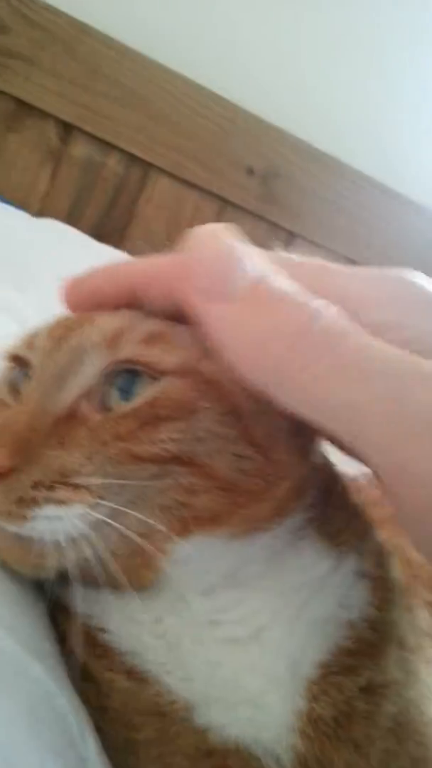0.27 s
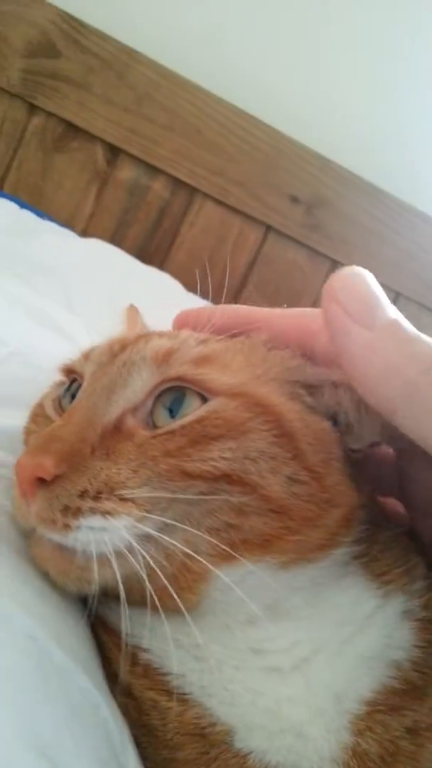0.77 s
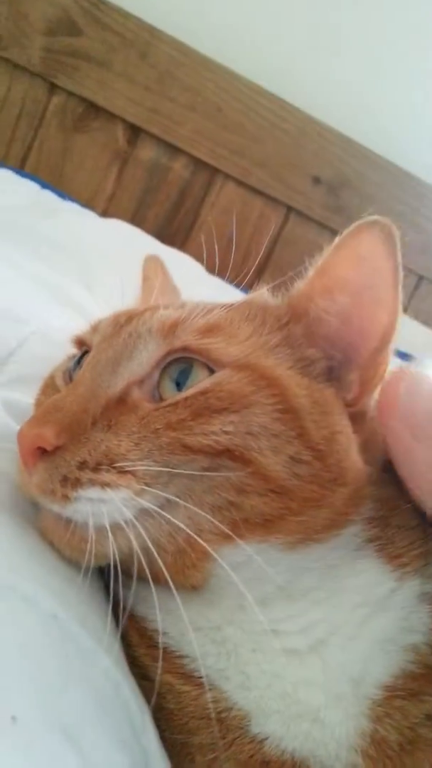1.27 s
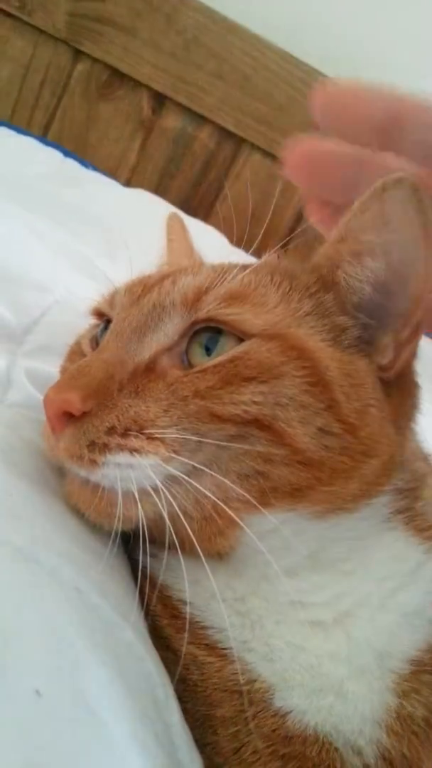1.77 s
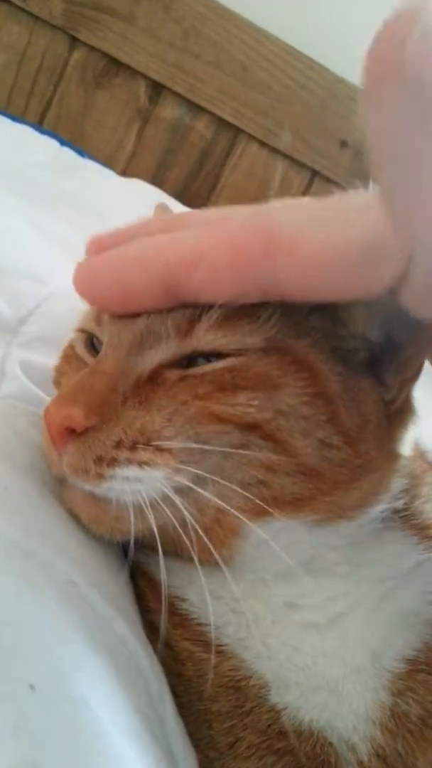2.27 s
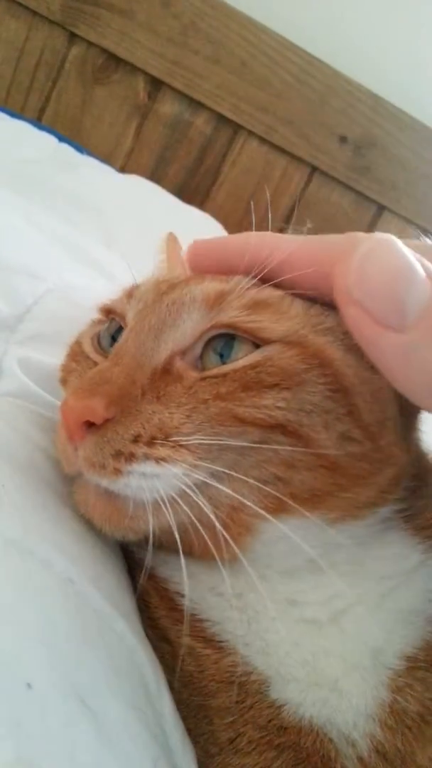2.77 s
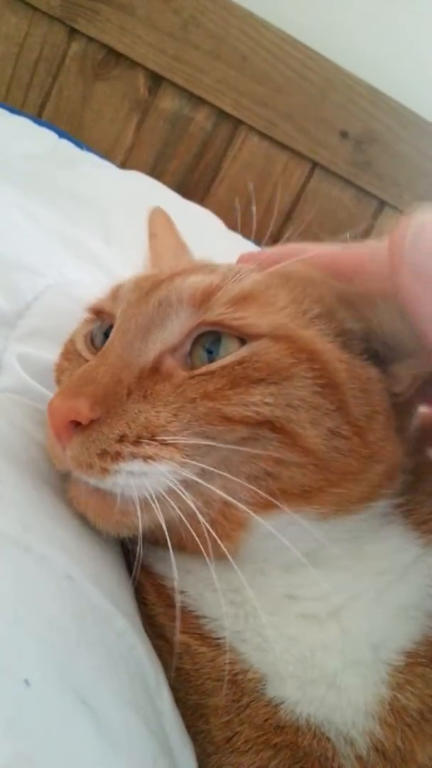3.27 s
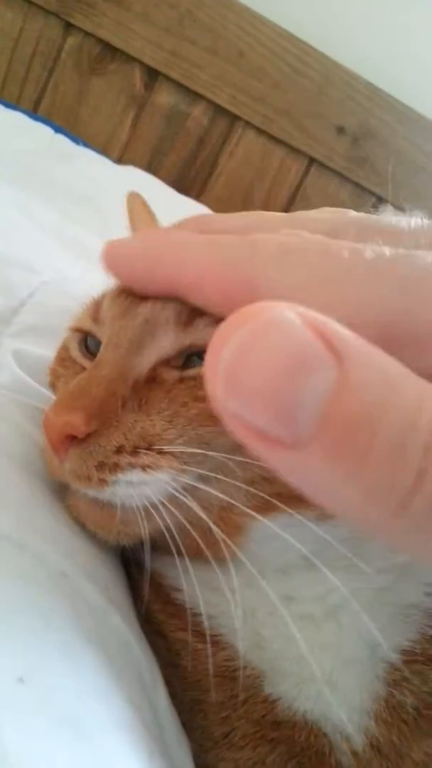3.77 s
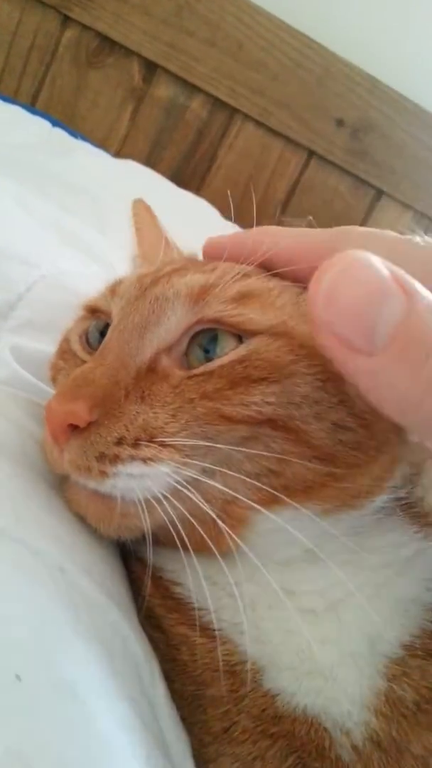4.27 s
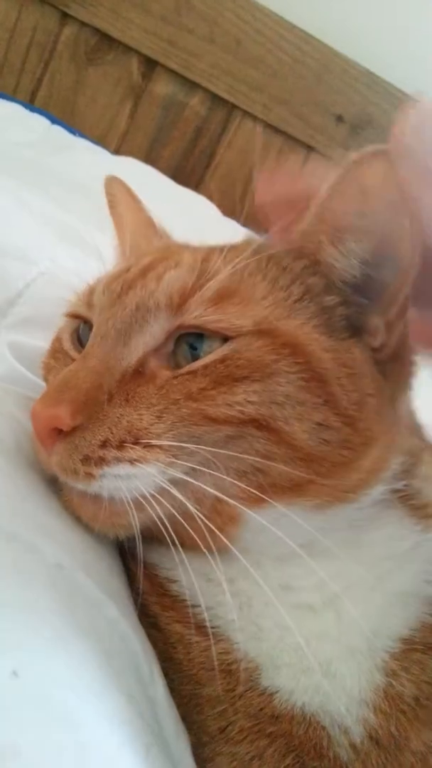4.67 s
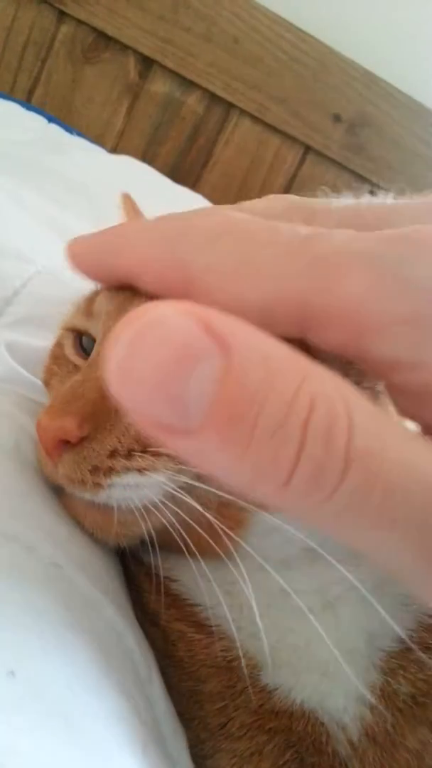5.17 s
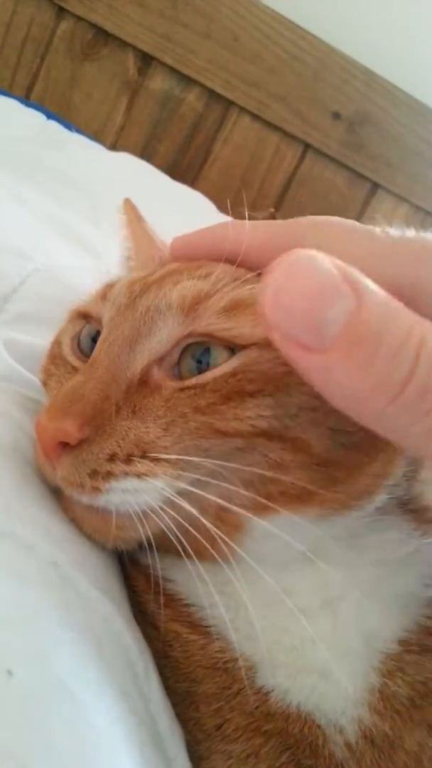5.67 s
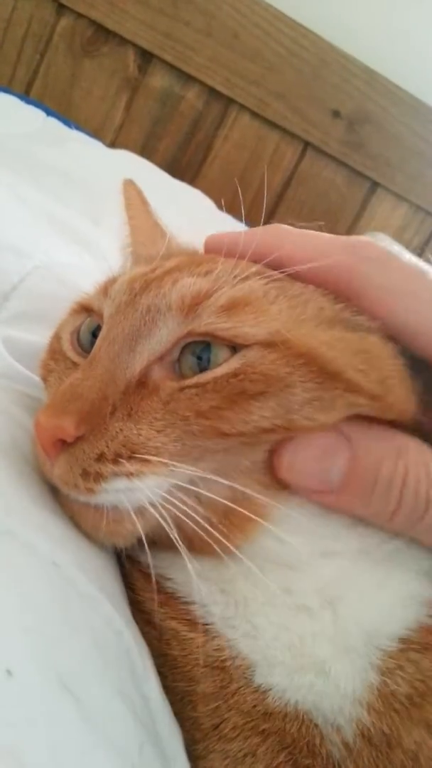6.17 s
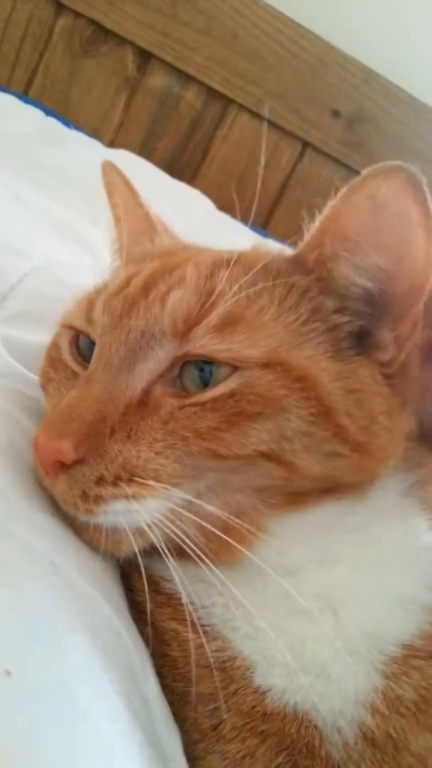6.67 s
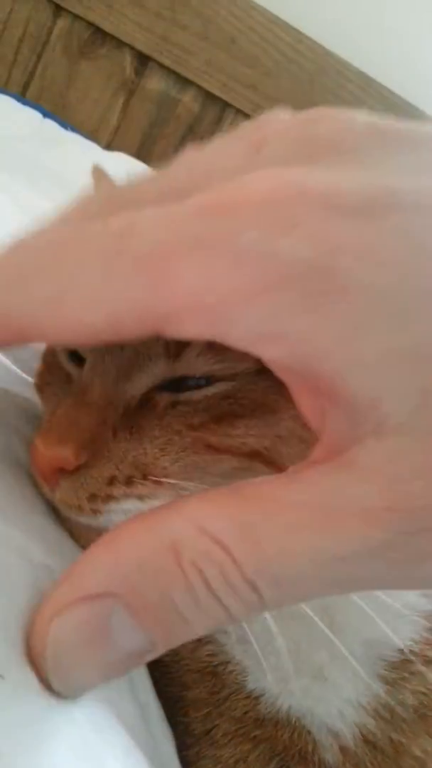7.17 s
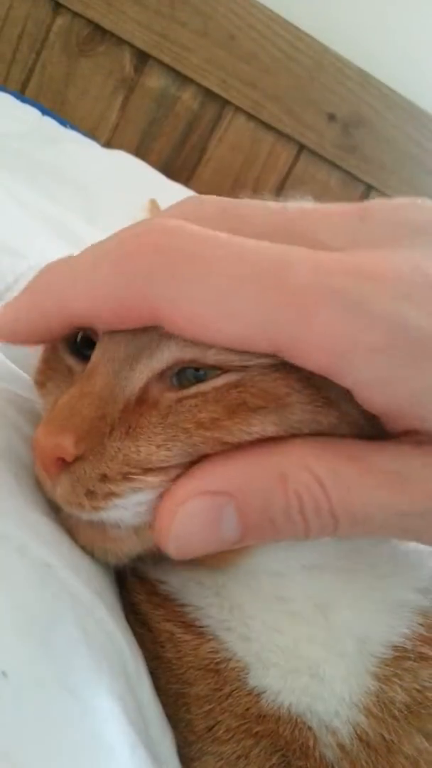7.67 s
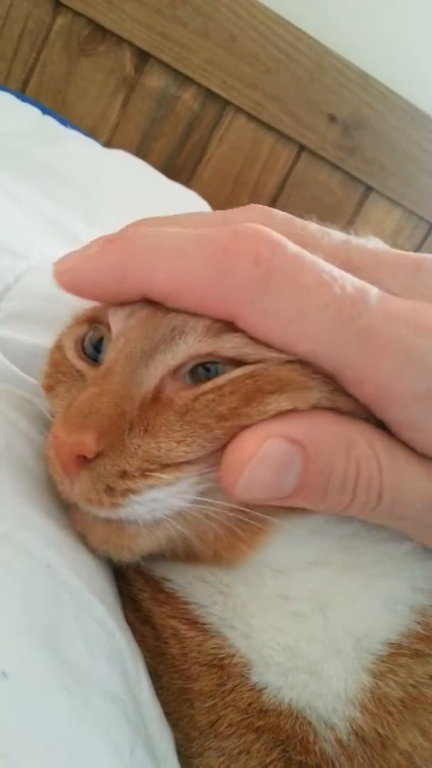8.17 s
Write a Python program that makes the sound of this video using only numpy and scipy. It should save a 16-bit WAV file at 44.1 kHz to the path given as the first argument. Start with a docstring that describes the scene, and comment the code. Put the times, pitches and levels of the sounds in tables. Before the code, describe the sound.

Close, dry indoor sound, with rubbing almost entirely on the left. From 0 to 0.45 s a loud, crackly rasp of fur and cloth bursts out, full of sharp snaps over soft padding thumps. It drops to near quiet, then light scratches return at 0.7 s, a small knock at 1.15 s, and a second strong crackling swipe from 1.3 to 1.6 s. Between 1.9 and 4.2 s come uneven, brighter, thinner strokes with brittle clicks, one fuller rub near 3.1 s. It is sparse until 5.2 s; a hard knock lands at 5.36 s, followed by short scratches to 5.95 s. Another knock hits at 6.3 s, then faint, slightly hollow rubbing, a brief sleeve brush on the right at 7.2 s, and a final knock at 8.28 s. Throughout, a very faint fluttering purr alternates with breaths over low hum, rumble and hiss.

```python
"""On a pillow a phone lies half sunk while a hand strokes a purring cat. Cloth and fur rub at the left port by
stick-slip friction: grains ring over a smooth slide, with snaps, padding bumps, knocks and a cupping hand.
The purr, pulses exciting chest resonances, reaches both ports along with a wavering low hum and room rumble.
The right port adds sharp ticks and hiss coloured by its resonance near 7 kHz, and a sleeve brushes past it."""
import sys
import numpy as np
from scipy import signal
from scipy.fft import rfft, irfft
from scipy.io import wavfile
from scipy.ndimage import uniform_filter1d

SR = 44100
rng = np.random.default_rng(int(sys.argv[2]) if len(sys.argv) > 2 else 0)


def generate_wav(sig):
    """Save sig (samples, or channels by samples) to the path in sys.argv[1] as 16-bit PCM at SR."""
    pcm = np.round(np.clip(np.atleast_2d(sig).T, -1, 1) * 32767).astype(np.int16)
    wavfile.write(sys.argv[1], SR, pcm)


N = 370440

# frequency response of the right microphone port: [f/Hz, gain/dB]
PORT_RESPONSE = [(300, 6.5), (900, -0.5), (3000, 0), (5200, -0.5), (6200, 2.5), (7300, 11.5), (8300, 2.5),
                 (10000, -1), (15000, -5)]


def rubbing(per_s=150.0, spread_db=5.0, ring_share=0.31, patchy_db=3.5, hollow_db=-3.0, hollow_octaves=0.19):
    """Stick-slip friction: fibres release in unequal grains, each with its own resonance, over a smooth slide."""
    # resonances of the grains: [f/Hz, width/Hz, gain/dB]
    grain_rings = [(2000, 770, 8.5), (3100, 2200, -8.5), (4300, 3100, -1), (5900, 1370, 9),
                   (7100, 1040, 12.5)]
    # spectral shape of the fabric: [f/Hz, gain/dB]
    fabric = [(35, -11), (60, -11), (178, 3), (251, 0.5), (390, 2.5), (551, -1.5), (679, -0.5), (835, -2.5),
              (3120, 0.5), (6090, -0.5), (9020, -6.5), (12800, -10), (15000, -20)]
    # colour of the rub as the fold shifts: [t/s, low level/dB, middle level/dB, top level/dB (all relative
    # to the bright range), favoured f/Hz, smooth slide's share of the power/1]
    fold = [(0, -3, -3.5, -9.5, 3500, 0.45), (.6, -2, -2.5, -4, 3200, 0.62),
            (1.4, -8, -8.5, -8.5, 3360, 0.69), (2.3, -8, -9.5, -8.5, 3260, .3),
            (2.9, -11, -11.5, -11.5, 5650, .42), (4.1, -9.5, -8.5, -9.5, 4740, 0.43),
            (4.6, -12.5, -18.5, -14, 4300, 0.77), (5.3, -7.5, -10, -16, 4100, 0.54),
            (5.7, -7.5, -7, -7.5, 3140, 0.26), (6.3, -15, -15.5, -18, 2520, 0.62),
            (7, -9, -8.5, -17.5, 2430, 0.7), (7.5, -6.5, -1.5, -3, 6160, 0.38),
            (8, -12, -12.5, -23, 4300, 0.87), (8.4, -10.5, -5.5, -50, 4830, 0.21)]
    body_db, middle_db, top_db, hollow_hz, smooth = curve(fold)
    smooth = np.clip(smooth, 0, 1)

    grains = np.zeros(N)
    for hz, width_hz, db in grain_rings:
        at = rng.integers(0, N, int(per_s * N / SR))  # per_s grains a second for each resonance
        size_db = spread_db * np.minimum(rng.exponential(size=len(at)), 3.4)
        clicks = np.zeros(N)
        clicks[at] = undb(size_db) * rng.choice([-1, 1], len(at))
        grains += (1 - ring_share) * clicks + ring_share * undb(db) * ring(clicks, hz, width_hz)
    slide = rng.standard_normal(N) * undb(patchy_db * walk(110))
    mixture = np.sqrt(1 - smooth) * level(grains, 0) + np.sqrt(smooth) * level(slide, 0)
    body, middle, bright, top = split(colour(mixture, fabric), [750, 2300, 8700])

    # the pocket of air under the fold favours the rings near its own pitch, which moves as the fold shifts
    hollow = np.zeros(N)
    for hz, width_hz, _ in grain_rings:
        nearness = np.exp(-(np.log2(hollow_hz / hz) / hollow_octaves) ** 2)
        hollow += nearness * ring(bright, hz, width_hz)
    bright = level(bright + undb(hollow_db) * hollow, 0)
    whole = bright + undb(body_db) * body + undb(middle_db) * middle + undb(top_db) * top
    return pressure() * whole


def pressure():
    """Friction drive: powers add, a steady slide plus jerks that decay exponentially either side of a round peak."""
    # steady slide of the cloth: [t/s, relative level/dB]
    slide_levels = [(0, -44.5), (.3, -31), (.42, -42.5), (.57, -49.5), (1.06, -50.5), (1.28, -44.5),
                    (1.45, -31.5), (1.64, -46), (1.77, -58), (2.3, -45.5), (2.8, -52), (3.8, -64.5),
                    (4.5, -60.5), (4.72, -52), (5.15, -67), (5.3, -57), (6.0, -54), (6.09, -41.5),
                    (6.41, -70), (6.55, -47.5), (7.15, -49), (7.28, -60), (7.57, -46.5), (7.75, -56.5),
                    (7.86, -44), (8.1, -39.5), (8.19, -40), (8.24, -69), (8.4, -54)]
    # jerks, where the cloth catches and drags: [t of peak/s, relative peak level/dB, length/s]
    jerks = [(0.088, -27, 0.28), (0.746, -39.5, 0.21), (0.984, -40, 0.074), (1.168, -40, 0.23),
             (1.241, -36.5, 0.076), (1.505, -23.5, 0.16), (1.712, -40, 0.097), (1.797, -39, 0.055),
             (1.925, -30.5, .22), (2.088, -36, 0.095), (2.312, -36.5, 0.22), (2.441, -33, 0.073),
             (2.532, -32, 0.1), (2.67, -34, 0.069), (2.866, -35, 0.093), (3.006, -39, 0.18),
             (3.122, -26, .11), (3.252, -42.5, 0.16), (3.424, -40.5, .11), (3.601, -35, 0.19),
             (3.741, -35, 0.071), (3.84, -54, 0.11), (3.94, -33, 0.046), (3.99, -47.5, 0.13),
             (4.078, -41, 0.053), (4.156, -35, 0.068), (4.27, -50, 0.33), (4.388, -50.5, 0.085),
             (4.469, -50, 0.023), (4.634, -42, 0.22), (4.863, -46, 0.26), (5.08, -43.5, 0.47),
             (5.213, -35.5, 0.052), (5.368, -36, 0.024), (5.467, -38.5, 0.098), (5.598, -40, 0.069),
             (5.692, -37.5, 0.12), (5.787, -55, .08), (5.829, -35.5, 0.074), (5.93, -37.5, 0.061),
             (6.285, -47, 0.23), (6.455, -46, 0.033), (6.532, -41, 0.19), (6.681, -39.5, 0.16),
             (6.787, -39.5, 0.077), (7.002, -40.5, 0.31), (7.173, -38, 0.21), (7.814, -37, 0.082),
             (8.264, -48, 0.077)]
    rise_share = 0.44  # share of the length before the peak
    slope_db = 22.5  # fall per side length, beyond the rounded peak
    rounding = 0.17  # part of each side that is rounded off
    t = np.arange(N) / SR
    power = undb(curve(slide_levels)[0]) ** 2
    for s, db, length in jerks:
        near = slice(max(int((s - length) * SR), 0), int((s + length) * SR))
        side = np.where(t[near] < s, rise_share, 1 - rise_share) * length
        distance = np.hypot((t[near] - s) / side, rounding) - rounding
        power[near] += undb(db - slope_db * distance) ** 2
    return np.sqrt(power)


def fibre_snaps():
    """Impulsive release of stored strain: the loudest fibres letting go."""
    # snaps: [t/s, relative peak level/dB, f/Hz]
    snaps = [(.0501, -18, 2900), (.0568, -18, 2000), (.0702, -11, 6600), (.0766, -26, 3300),
             (.0916, -11, 2090), (.103, -6, 6200), (.1271, -17, 3100), (.1625, -7.5, 3500),
             (.1781, -20, 3500), (.2208, -1, 3580), (.2652, -9.5, 3480), (.2874, -11, 3300),
             (.2932, -21, 5600), (.3052, -14, 3200), (.337, -22, 3800), (.3456, -7.5, 3270),
             (.362, -13, 5700), (.3704, -12, 5600), (.4019, -18, 7800), (.4099, -10.5, 5900),
             (.4195, -22, 3400), (.7016, -15, 2950), (.7469, -8, 3330), (.7589, -11, 3100),
             (.9897, -13.5, 4760), (1.1528, -9, 4300), (1.163, -15.5, 3000), (1.2372, -16.5, 5130),
             (1.3023, -15, 3400), (1.3217, 0.5, 5050), (1.3754, -4.5, 3770), (1.3841, -3.5, 6260),
             (1.4188, -13, 3100), (1.4392, -11, 4100), (1.4496, -7.5, 3600), (1.5106, -10, 3000),
             (1.5455, -12, 3100), (1.5573, -21, 3850), (1.6303, -13.5, 3730), (1.9323, -20, 3340),
             (1.9929, -11, 3670), (2.1385, -19.5, 3000), (2.2012, -15.5, 5900), (2.2667, -18, 7300),
             (2.298, -11.5, 6060), (2.3403, -6, 6000), (2.3495, -9, 6400), (2.3756, -17.5, 6600),
             (2.4092, -17.5, 5300), (2.4691, -11.5, 6600), (2.5523, -6, 6000), (2.5639, -12.5, 5900),
             (2.5803, -9, 5800), (2.6743, -10, 6400), (2.6894, -10.5, 5640), (2.8367, -19, 5900),
             (2.8602, -10.5, 6650), (2.8899, -12, 6130), (2.9886, -11, 5900), (3.012, -7.5, 6600),
             (3.059, -24, 6500), (3.4446, -11, 5840), (3.5864, -4.5, 5800), (3.6232, -9.5, 6500),
             (3.6684, -10.5, 4930), (3.7562, -11, 5900), (3.8876, -19, 7200), (3.9288, -18, 6450),
             (4.1405, -11, 6900), (4.1461, -17, 6600), (4.2788, -21.5, 6260), (4.6902, -17, 4360),
             (5.2323, -17, 4300), (5.3695, -19, 4300), (5.4583, -6.5, 7100), (5.5923, -15.5, 6840),
             (5.6618, -9, 6750), (5.668, -10.5, 6940), (5.6891, -14, 6900), (5.6966, -12, 6300),
             (5.7689, -19, 6500), (5.7737, -7.5, 3800), (5.83, -14, 7000), (5.9476, -19, 5740),
             (6.1515, -25, 7460), (6.26, -27, 5300), (6.3641, -22.5, 6200), (6.707, -19.5, 5900),
             (6.7966, -19, 5100), (6.908, -16, 5050), (7.066, -18, 5600), (7.0951, -13.5, 5330),
             (7.1735, -11, 6500), (7.2419, -19.5, 5030), (7.801, -11, 6900), (8.1854, -25, 4100),
             (8.2596, -30, 5800)]
    return place(snaps, snap)


def snap(t, noise, hz, burst_s=0.00021, ragged=0.31, tail_db=-30.0, wide_db=-5.5):
    """Impulse response: one sharp, ragged release excites a broad resonance and leaves a faint tail."""
    release = (t == 0) + ragged * noise * np.exp(-t / burst_s)
    tail = undb(tail_db) * noise * np.exp(-t / 0.0038)
    burst = band(release + tail, 1090, 7030)
    return ring(burst, hz, hz / 2) + undb(wide_db) * burst


def case_knocks():
    """Impact excitation: a knuckle or nail strikes the case."""
    # knocks: [t/s, relative peak level/dB, crack f/Hz, rattle peak level relative to crack/dB]
    knocks = [(1.152, -8, 3600, -18), (5.3583, -2.5, 4300, -19.5), (6.3007, -3, 4000, -27.5),
              (7.8005, -36, 3500, -8), (8.2815, -4, 3560, -15.5)]
    return place(knocks, knock)


def knock(t, noise, hz, rattle_db, fall_s=0.0068, crack_s=0.00028):
    """Impact and forced response: a crack, duller than a snap, and the short mid-pitched rattle of the case."""
    impact = (t == 0) + noise * np.exp(-t / crack_s)
    crack = band(band(impact, 1760, 9200), hz / 2, 1.39 * hz)
    rattle = band(noise * np.exp(-t / fall_s), 490, 3200)
    return crack / abs(crack).max() + undb(rattle_db) * rattle / abs(rattle).max()


def cupped(x, edge_s=0.17):
    """Cavity resonance: the hollow of a hand over the left port lifts or cancels two bands."""
    # cupping: [start t/s, end t/s, gain added at the low ring/1, gain added at the high ring/1]
    cuppings = [(6.48, 7.174, .4, 0.76), (7.81, 8.465, 0.77, -0.98)]
    # low and high resonance of the hollow: [f/Hz, width/Hz]
    cavity_rings = [(650, 260), (2600, 650)]
    low_ring, high_ring = [ring(x, hz, width_hz) for hz, width_hz in cavity_rings]
    out = x.copy()
    for start, end, low, high in cuppings:
        out += swell(start, end, edge_s) * (low * low_ring + high * high_ring)
    return out


def padding_bumps():
    """Damped low resonance: soft pushes of the padding."""
    # bumps: [t/s, relative peak level/dB, f/Hz]
    bumps = [(.037, -22.5, 393), (.14, -38, 377), (.446, -28.5, 410), (.596, -29.5, 400), (1.159, -28, 390),
             (1.313, -32.5, 344), (1.479, -23, 386), (1.912, -45, 412), (2.335, -29, 433),
             (2.524, -41, 283), (2.63, -38, 298), (3.102, -28, 466), (3.521, -45, 248), (3.584, -36.5, 557),
             (4.071, -45, 269), (4.224, -40, 302), (4.363, -44, 273), (4.609, -40, 315),
             (4.692, -38.5, 235), (5.358, -27, 204), (5.459, -42, 326), (5.656, -36, 509),
             (5.771, -40, 377), (6.3, -37, 374), (7.794, -31, 580), (8.283, -28.5, 328)]
    return place(bumps, bump)


def bump(t, noise, hz, rise_s=0.0013, fall_s=0.0081):
    """Heavy damping: a soft push rings low and dies within a few cycles."""
    push = noise * (1 - np.exp(-t / rise_s)) * np.exp(-t / fall_s)
    return ring(ring(push, hz, 1.2 * hz), hz, hz)


def breathing_purr():
    """Alternating excitation: deep and throbbing on the breath out, lighter and ticking on the breath in."""
    # breaths: [t of breathing out/s, relative level out/dB, relative level in/dB]
    breaths = [(-.04, -63, -64), (.68, -62, -70), (1.38, -56.5, -59), (2.05, -56, -61), (2.83, -62, -77),
               (3.55, -57.5, -74), (4.3, -75, -65), (5.05, -60, -65), (5.75, -59, -64.5),
               (6.48, -58.5, -59), (7.34, -65, -57.5), (8.08, -63, -70)]
    # chest and throat resonances, breath out: [f/Hz, width/Hz, relative level/dB]
    chest_out = [(62, 25, -8), (93, 16, 0), (186, 30, -4), (400, 260, -3)]
    # chest and throat resonances, breath in: [f/Hz, width/Hz, relative level/dB]
    chest_in = [(66, 22, -2), (100, 40, -6), (175, 45, -5), (420, 260, -3), (1500, 2000, -20)]
    out_s, pause_s, in_s = 0.248, 0.036, 0.335
    breaths_out = [(s, db) for s, db, _ in breaths]
    breaths_in = [(s + out_s + pause_s, db) for s, _, db in breaths]
    purr_out = purr(breaths_out, out_s, 31.1, chest_out, airy=0.045)
    purr_in = purr(breaths_in, in_s, 33.7, chest_in, airy=0.025)
    return purr_out + purr_in


def purr(breaths, length, hz, chest, airy, edge_s=0.038):
    """Source and filter: the larynx flaps shut hz times a second; flap and air puff ring chest and throat."""
    pulses = np.zeros(N)
    chance = rng.standard_normal((int(N / SR * 40), 2))  # irregular period and strength of each flap
    at = np.cumsum((1 + 0.03 * chance[:, 0]) * SR / hz).astype(int)
    pulses[at[at < N]] = undb(2 * chance[at < N, 1])
    puff_decay = np.exp(-1 / (0.012 * SR))  # time constant 12 ms
    puff = signal.lfilter([1], [1, -puff_decay], pulses) * rng.standard_normal(N)
    source = pulses + airy * puff
    flow = sum(undb(db) * swell(start, start + length, edge_s) for start, db in breaths)
    voice = np.zeros(N)
    for f, width_hz, db in chest:
        voice += undb(db) * level(ring(ring(source, f, width_hz), f, 2 * width_hz), 0)
    return level(voice, 0) * flow


def far_ticks():
    """Short transients: sharp ticks at the right port."""
    # ticks: [t/s, relative peak level/dB]
    ticks = [(5.1, -37), (5.232, -35), (5.3575, -27), (5.369, -36), (5.773, -33), (6.11, -50.5),
             (6.3005, -29), (8.281, -33)]
    return place(ticks, tick)


def tick(t, noise, fall_s=0.002):
    """Port resonance: a decaying noise burst heard through the port, with some low body."""
    burst = noise * np.exp(-t / fall_s)
    return colour(burst, PORT_RESPONSE) + 0.66 * band(burst, 500, 3000)


def brush(start_s=7.172, peak_db=-50, hold_s=0.18, fade_db_s=200):
    """Amplitude envelope: a sleeve brushes past; quick start, short hold, then exponential decay."""
    late = np.maximum(np.arange(N) / SR - start_s - hold_s, 0)
    return swell(start_s - 0.015, N / SR + 1, 0.013) * undb(peak_db - fade_db_s * late)


def right_hiss(hiss_db=-59):
    """Noise through a resonant port: wavering microphone hiss, with the sleeve's brush in the same colour."""
    noise = level(colour(rng.standard_normal(N), PORT_RESPONSE), 0)
    return noise * undb(0.69 * walk(5.3)) * (undb(hiss_db) + brush())


def left_hiss():
    """Band-limited noise: the steady hiss of the left microphone."""
    return level(band(rng.standard_normal(N), 4100, 11500), -61.5)


def hum(mean_hz=62.7):
    """Frequency and amplitude modulation: a low sine wavers in pitch as its level rises and falls."""
    # hum: [t/s, relative rms level/dB]
    hum_levels = [(0, -63), (4.9, -92), (5.3, -69), (5.8, -63), (6.2, -76), (6.6, -66), (7.2, -60),
                  (7.4, -93), (8.4, -72)]
    wave = np.sin(2 * np.pi * np.cumsum(mean_hz + 2.54 * walk(2.7)) / SR)
    return np.sqrt(2) * wave * undb(curve(hum_levels)[0] + 1.2 * walk(9.7))


def room_rumble(rumble_db=-63.0):
    """Diffuse background: low-pitched noise whose level wavers, drawn independently for each port."""
    # spectral shape of the room: [f/Hz, gain/dB]
    room = [(25, 23), (45, 23.5), (120, 14), (300, 9), (700, -33), (1500, -46), (4000, -46)]
    return level(colour(rng.standard_normal(N), room), rumble_db) * undb(1.2 * walk(11))


def undb(db):
    """Logarithmic level: decibels to an amplitude ratio."""
    return 10 ** (np.asarray(db) / 20)


def level(x, db):
    """Mean power: scales a signal to an rms level."""
    return x * undb(db) / np.sqrt(np.mean(x ** 2))


def curve(table):
    """Linear interpolation: each column of (t/s, ...) rows becomes one value a sample."""
    s, *columns = np.transpose(table)
    return [np.interp(np.arange(N) / SR, s, c) for c in columns]


def swell(start, end, edge_s):
    """Linear envelope: rises at the start, holds at 1, falls to the end."""
    t = np.arange(N) / SR
    return np.clip(np.minimum(t - start, end - t) / edge_s, 0, 1)


def walk(rate):
    """Smoothed random modulation: levels held 1 / rate s and averaged twice; spread near 1."""
    k = int(SR / rate)
    steps = np.repeat(rng.standard_normal(N // k + 1), k)
    return 1.3 * uniform_filter1d(uniform_filter1d(steps, k), k)[:N]


def ring(x, hz, width_hz):
    """Simple resonator: gain 1 at the centre."""
    return signal.lfilter(*signal.iirpeak(hz, hz / width_hz, fs=SR), x)


def band(x, lo_hz, hi_hz):
    """Band-pass filtering: a Butterworth filter keeps what lies between two edges."""
    return signal.sosfilt(signal.butter(2, [lo_hz, hi_hz], "bandpass", fs=SR, output="sos"), x)


def colour(x, points, size=4096):
    """Minimum phase: a causal filter with the gain of (f/Hz, gain/dB) points, built from the cepstrum."""
    hz, db = np.transpose(points)
    f = np.maximum(np.arange(size // 2 + 1) * SR / size, 1)
    cepstrum = irfft(np.log(undb(np.interp(np.log(f), np.log(hz), db))))
    cepstrum[1:size // 2] *= 2  # fold the anticausal half onto the causal half
    cepstrum[size // 2 + 1:] = 0
    return signal.fftconvolve(x, irfft(np.exp(rfft(cepstrum))))[:len(x)]


def split(x, edges_hz):
    """Complementary filters: ranges between the edges, each at rms 1; unscaled they would add up to x again."""
    f = np.maximum(np.fft.rfftfreq(len(x), 1 / SR), 1)
    above = [np.ones_like(f)] + [1 / (1 + (hz / f) ** 4) for hz in edges_hz] + [0]
    spectrum = rfft(x)
    return [level(irfft(spectrum * (a - b), len(x)), 0) for a, b in zip(above, above[1:])]


def place(events, shape, length=2048):
    """Superposition: adds one short sound per row at its time and peak level."""
    t = np.arange(length) / SR
    out = np.zeros(N + length)
    noises = rng.standard_normal((len(events), length))
    for (s, peak_db, *rest), noise in zip(events, noises):
        one = shape(t, noise, *rest)
        start = int(s * SR)
        out[start:start + length] += undb(peak_db) * one / abs(one).max()
    return out[:N]


def scene():
    """Superposition at two ports: cloth at the left, ticks and hiss at the right; purr, hum and room in both."""
    near_db, low_left_db = 4.5, 3.5  # gains at the left port
    cloth = cupped(rubbing() + fibre_snaps() + case_knocks()) + padding_bumps()
    low = breathing_purr() + hum()
    left = undb(near_db) * cloth + undb(low_left_db) * (low + room_rumble()) + left_hiss()
    lag = int(0.0014 * SR)  # purr and hum reach the right port 1.4 ms later
    right = np.roll(low, lag) + room_rumble() + far_ticks() + right_hiss()
    return np.array([left, right])


def record(dry):
    """Band limits and saturation: the phone cuts the lowest bass, rounds and clips loud peaks and cuts the top."""
    high_pass = signal.butter(2, 45.0, "highpass", fs=SR, output="sos")
    low_pass = signal.ellip(10, 0.3, 70, 14700, fs=SR, output="sos")
    wet = signal.sosfilt(high_pass, dry)
    rounded = np.tanh(0.8 * wet) / 0.8
    return signal.sosfilt(low_pass, np.clip(rounded, -0.95, 0.95))


dry = scene()
out = record(dry)
generate_wav(out)
```